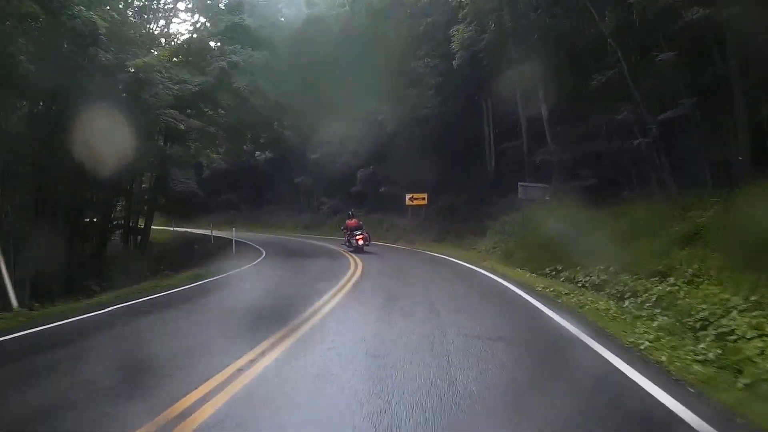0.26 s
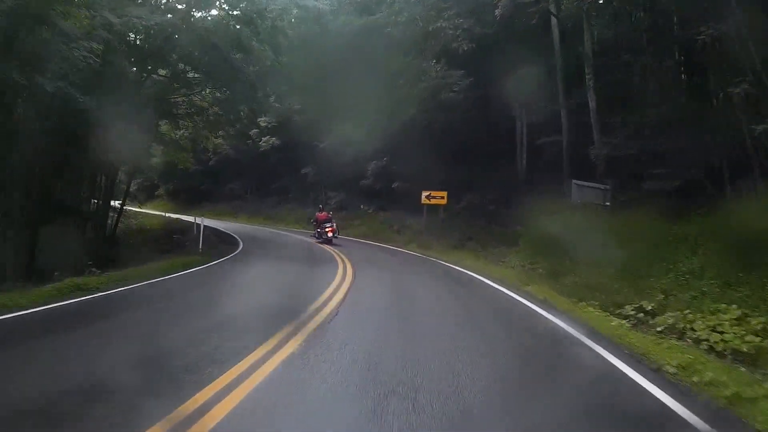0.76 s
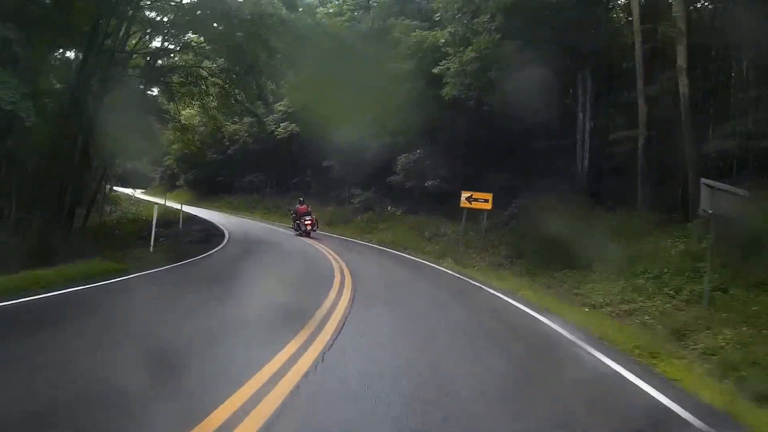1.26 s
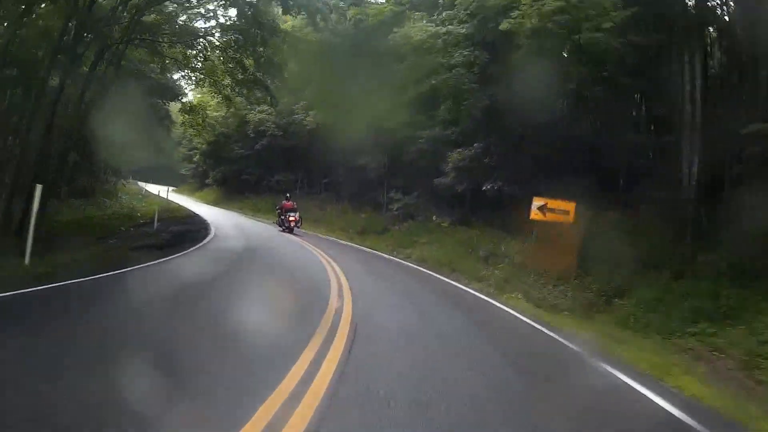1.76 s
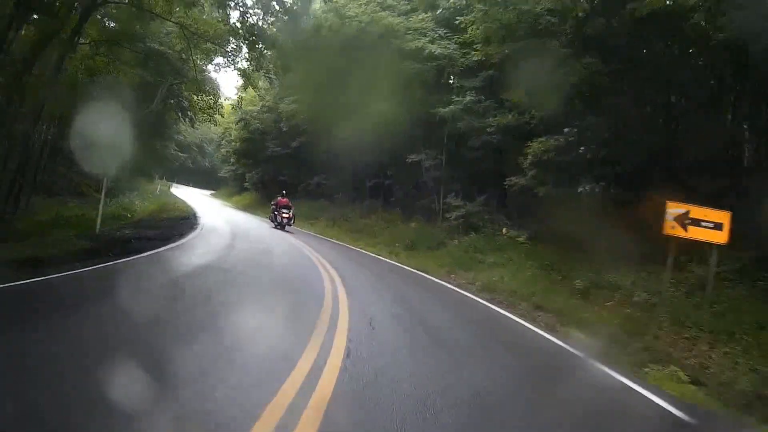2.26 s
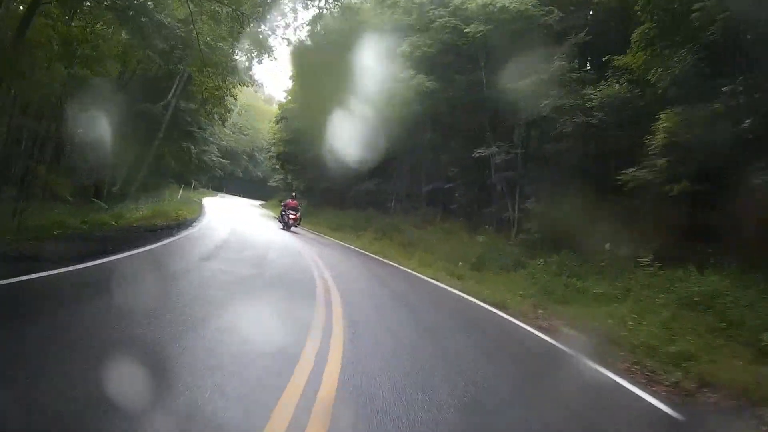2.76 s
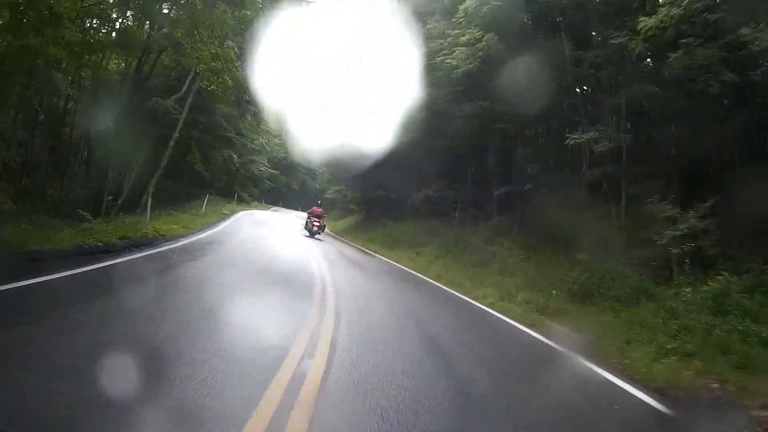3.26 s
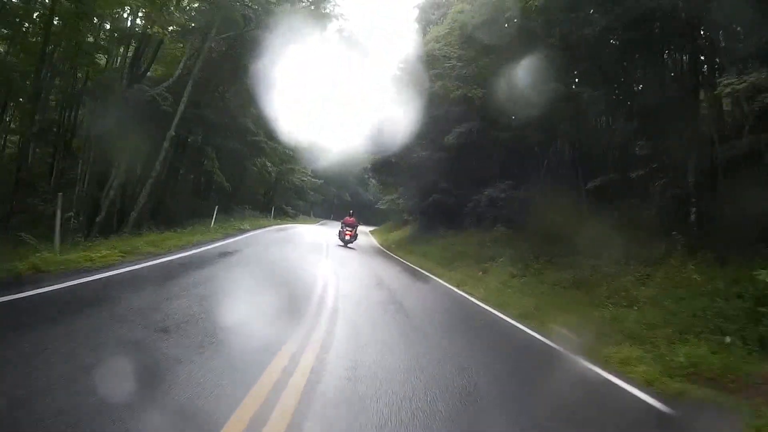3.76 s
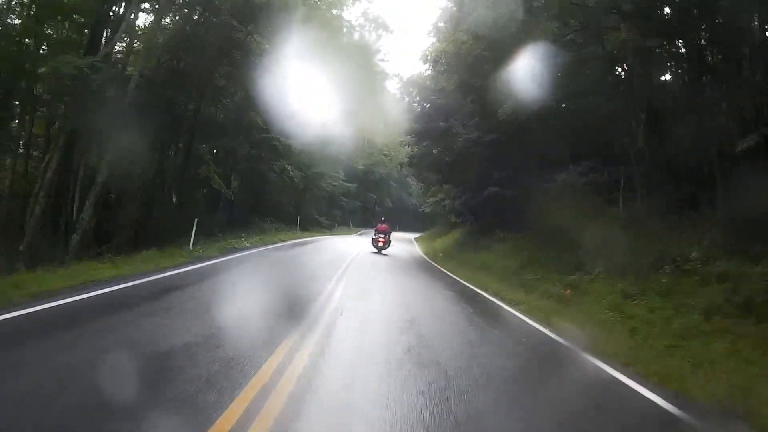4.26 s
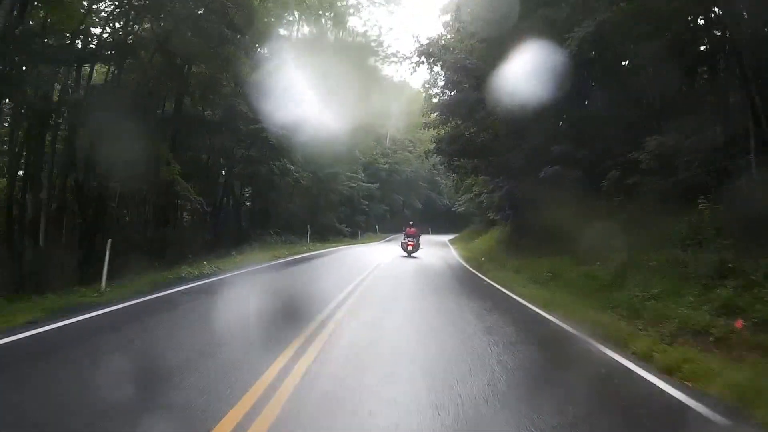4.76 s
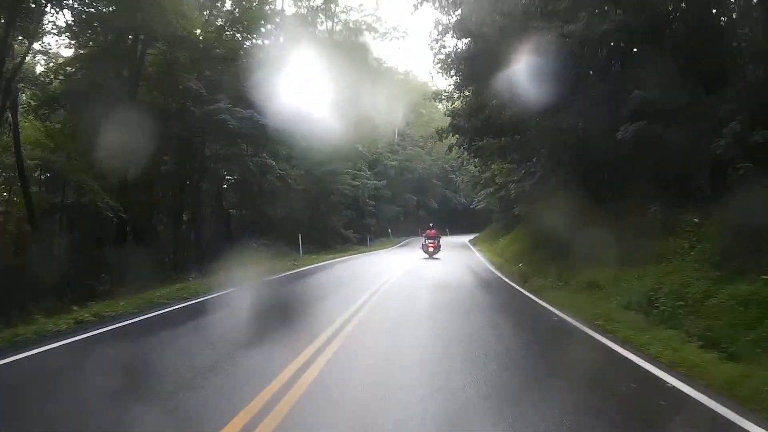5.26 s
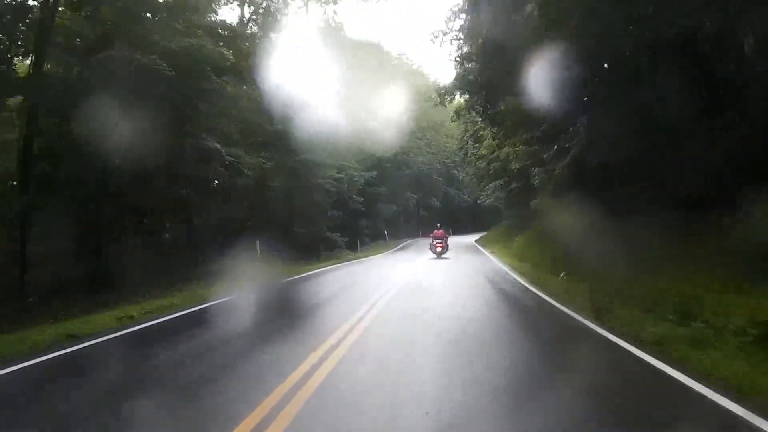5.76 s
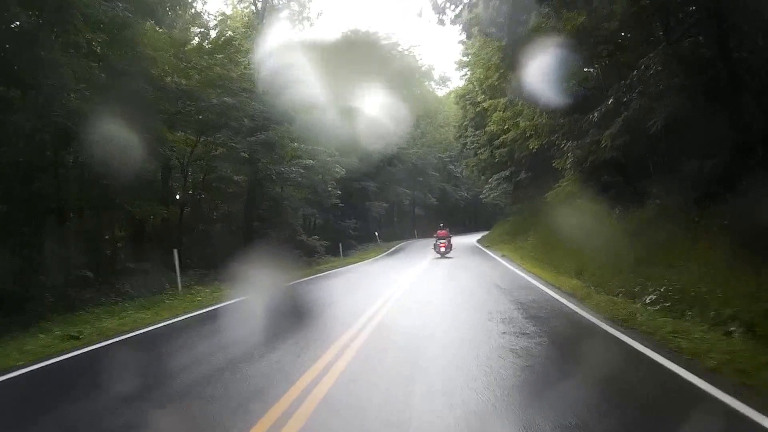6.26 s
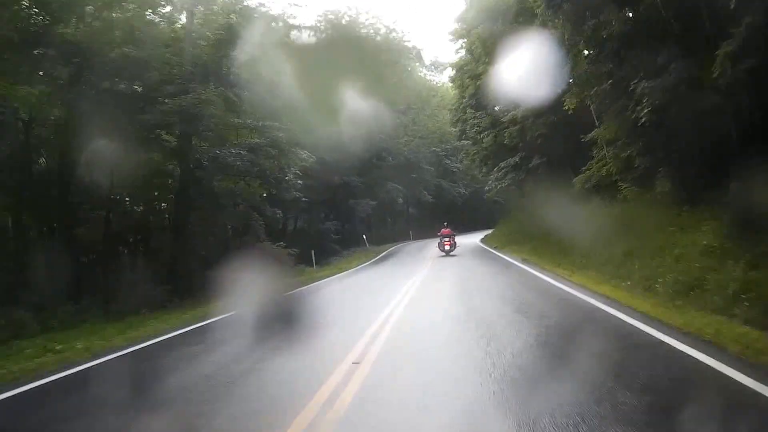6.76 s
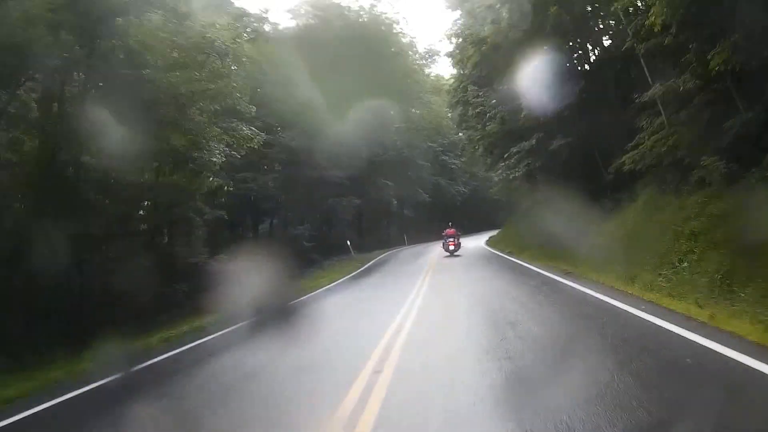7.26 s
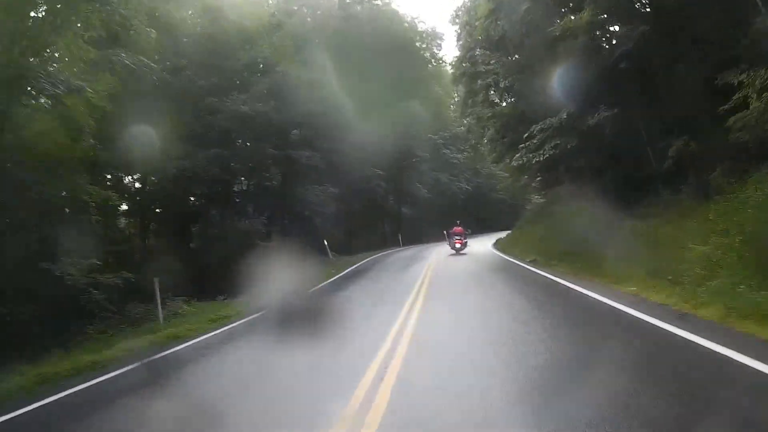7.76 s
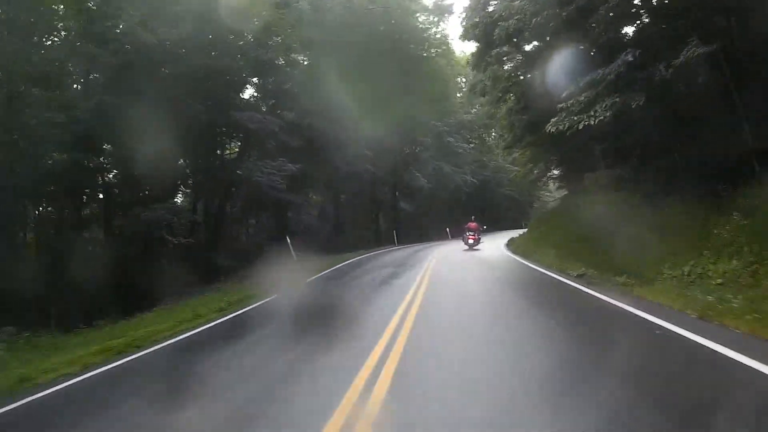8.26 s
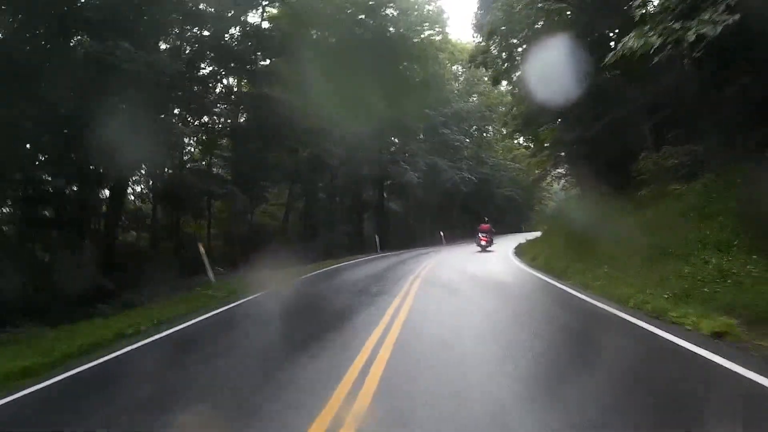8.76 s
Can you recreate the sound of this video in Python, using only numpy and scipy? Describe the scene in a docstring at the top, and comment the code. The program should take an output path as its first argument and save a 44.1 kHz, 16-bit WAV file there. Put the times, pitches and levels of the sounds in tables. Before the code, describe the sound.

A continuous on-board motorcycle ride on a wet road, heard close from the rider's seat. At 0 seconds the twin-cylinder engine falls in pitch, settling by about 0.7, with a brief lull in the exhaust before heavier thuds begin near 0.4. It lugs with a rough, uneven low throb; especially hard thumps cluster between 1.5 and 3 seconds, flattening at the microphone and momentarily choking the hiss. Faint thin treble ticks sizzle in flurries from 1.3 to 4.4. From about 2 seconds the pitch climbs slowly and the drone swells, its humming overtones shifting. Metallic valve rattle flutters through the wind. After 5.5 the rush of air, grainy tyre spray and fine top hiss grow clearly stronger. Low booming puffs build from 6 to 8.5, then ease abruptly near 8.6, while the engine keeps rising to the end at 9.

```python
"""A V-twin motorcycle heard from the rider's seat on a wet road: it slows at first, then slowly gathers speed.
Exhaust puffs are dip-and-crest pulses at uneven firing times; crank harmonics drone through fixed resonances.
The valve gear is noise gated by the firings, which also rings the casing.
Wind, spray and mist are coloured noises growing with speed; faint ticks sizzle at the very top.
The microphone flattens the hardest firings."""
import sys
import numpy as np
from scipy import signal
from scipy.fft import rfft, irfft
from scipy.io import wavfile
from scipy.ndimage import uniform_filter1d

SR = 44100
rng = np.random.default_rng(int(sys.argv[2]) if len(sys.argv) > 2 else 0)


def dump(signal):
    """Clip the signal to [-1, 1] and save it as 16-bit WAV at the path in sys.argv[1]."""
    limited = np.clip(np.atleast_2d(signal).T, -1, 1)
    pcm = np.round(limited * 32767).astype(np.int16)
    wavfile.write(sys.argv[1], SR, pcm)


N = 396900

# engine speed: t/s, crank rate/Hz
CRANK_SPEED = [(0, 44.65), (.65, 40.2), (1.3, 40.1), (1.95, 40.95), (2.63, 42.03), (3.88, 43.35),
               (5.14, 45.3), (5.76, 45.9), (6.12, 46.5), (7.4, 49.0), (8.2, 49.65), (9, 50.8)]
# throttle: t/s, mean peak of a usual puff/dB
PUFF_LEVEL = [(0, -18.5), (.28, -21), (.45, -12.5), (2, -16), (3.6, -12.5), (5.5, -13.5), (6.8, -7.5),
              (8.53, -4.5), (8.7, -13.5)]
CRUISE_HZ = 45  # crank rate at cruising speed


def undb(db):
    """Decibels to gain."""
    return 10 ** (np.asarray(db) / 20)


def unit(x):
    """Scale to rms 1."""
    return x / np.sqrt(np.mean(x ** 2))


def curve(table):
    """Second column of a table, joined by straight lines in time."""
    t_s, value = np.transpose(table)
    return np.interp(np.arange(N) / SR, t_s, value)


def octaves():
    """Engine speed in octaves above cruising speed."""
    return np.log2(curve(CRANK_SPEED) / CRUISE_HZ)


def colour(x, points):
    """Shape a sound by a spectrum of (f/Hz, level/dB) points, joined over log frequency; rms 1."""
    hz, db = np.transpose(points)
    f_hz = np.maximum(np.fft.rfftfreq(N, 1 / SR), 1)
    gain = undb(np.interp(np.log(f_hz), np.log(hz), db))
    return unit(irfft(rfft(x) * gain, N))


def noise(points):
    """Steady coloured noise, rms 1."""
    return colour(rng.standard_normal(N), points)


def ring(x, modes):
    """Drive a set of resonances; neighbours swing in opposite senses."""
    out = np.zeros(N)
    for k, (hz, width_hz, db) in enumerate(modes):
        b, a = signal.iirpeak(hz, hz / width_hz, fs=SR)
        out += (-1) ** k * undb(db) * signal.lfilter(b, a, x)
    return unit(out)


def walk(rate_hz):
    """Smooth random wandering, rms 1: random steps averaged twice."""
    hold = int(SR / rate_hz)
    steps = np.repeat(rng.standard_normal(N // hold + 1), hold)
    return unit(uniform_filter1d(uniform_filter1d(steps, hold), hold)[:N])


def clicks(times_s, sizes):
    """One impulse at each time."""
    return np.bincount(np.clip(times_s * SR, 0, N).astype(int), sizes, N + 1)[:N]


def decay(taps, decay_s):
    """Exponential tail after each tap."""
    return signal.lfilter([1], [1, -np.exp(-1 / (decay_s * SR))], taps)


def firings(lag_turns):
    """One firing halfway through each crank turn, every second one late: the angle between the cylinders."""
    turns = np.cumsum(curve(CRANK_SPEED)) / SR
    k = np.arange(int(turns[-1]))
    return np.interp(k + .5 + lag_turns * (k % 2), turns, np.arange(N) / SR)


def puffs(times_s, peaks_db, width_s, widen):
    """Each puff is a dip, then a crest of pressure; stronger ones last longer (width_s holds at 0 dB)."""
    out = np.zeros(N)
    for t_s, db in zip(times_s, peaks_db):
        i = np.arange(max(int(t_s * SR) - SR // 20, 0), min(int(t_s * SR) + SR // 20, N))
        u = (i / SR - t_s) / (width_s * undb(widen * db))
        out[i] += undb(db) * u * np.exp((1 - u ** 2) / 2)
    return out


def exhaust():
    """Thudding pressure puffs, less uneven as speed rises; a hard firing displaces any usual one near it."""
    # hardest firings: t/s, peak/dB
    hard = [(.333, -2.5), (.795, -6), (1.025, -5), (1.074, -4.5), (1.193, -6), (1.497, 0.5), (1.544, -1.5),
            (1.692, -2.5), (1.891, 3), (1.964, -5), (2.034, -0.5), (2.11, -2.5), (2.161, 1.5), (2.303, 3),
            (2.376, -3.5), (2.518, -1.5), (2.614, 3), (2.708, -2.5), (2.735, -2), (2.805, 0.5),
            (2.825, -.5), (2.922, 0.5), (2.995, 0.5), (3.507, -1.5), (3.903, -4), (4.245, -0.5),
            (4.784, -5), (5.839, -4.5), (6.016, -3.5), (6.1, -2), (6.337, -1.5), (6.529, -2), (6.55, 2),
            (7.139, 4), (7.953, 1.5), (8.555, 1), (8.795, 0)]
    times_s = firings(lag_turns=0.065)
    at = np.minimum((times_s * SR).astype(int), N - 1)
    scatter_db = 3.5 - 1 * octaves()[at]
    peaks_db = curve(PUFF_LEVEL)[at] + scatter_db * rng.standard_normal(len(times_s))
    hard_s, hard_db = np.transpose(hard)
    usual = np.abs(times_s[:, None] - hard_s).min(axis=1) > .012
    usual_puffs = puffs(times_s[usual], peaks_db[usual], width_s=0.0027, widen=0.069)
    return usual_puffs + puffs(hard_s, hard_db, width_s=0.0031, widen=0.27)


def drone(waver_db, wobble_turns, boom_db):
    """Crank harmonics climb with speed; pipe and casing resonances lift those passing through."""
    # drone swelling as the engine takes up the load: t/s, level of a 0 dB harmonic/dB
    swell = [(0, -41), (.8, -35), (2.5, -30), (4, -29), (5.5, -31.5), (6.6, -29), (7.8, -31.5), (9, -28.5)]
    # harmonics: multiple of crank rate, level when lugging/dB, level above cruising speed/dB
    harmonics = [(3.006, 5, 1), (3.53, -13, -2.5), (4.013, -7, 1), (5.003, -6, -4), (6, -2.5, -1),
                 (6.47, -13.5, -5), (7, -14, -1.5), (8, 0, -1.5), (9.01, 0, 2.5), (10.02, -19, -8.5),
                 (10.96, -7, -19), (11.99, 0, -25), (13.03, 0, -4), (14.02, -2, -12), (15, -3.5, -20),
                 (16, -7, -25), (23.87, -19.5, -21), (25, -20.5, -15), (26, -18, -17), (27.24, -17, -13)]
    # pipe and casing resonances: f/Hz, width/Hz, lift/dB
    lifts = [(268.4, 26, 5.5), (338.2, 32.4, 8.5), (1067, 54, 10.5)]
    change_octaves = 0.0083  # centre and scale of the change from lugging to fast levels
    crank_hz, level_db = curve(CRANK_SPEED), curve(swell)
    fast = (1 + np.tanh((octaves() - change_octaves) / change_octaves)) / 2
    turns = np.cumsum(crank_hz) / SR + wobble_turns * walk(25)
    # second harmonic booms as the throttle opens
    out = undb(curve(PUFF_LEVEL) + boom_db + 1.8 * walk(14)) * np.sin(4 * np.pi * turns)
    for k, lugging_db, fast_db in harmonics:
        lift_db = np.zeros(N)
        for hz, width_hz, db in lifts:
            lift_db += db / (1 + (2 * (k * crank_hz - hz) / width_hz) ** 4)
        pattern_db = lugging_db + fast * (fast_db - lugging_db)
        gain = undb(level_db + pattern_db + lift_db + waver_db * walk(12))
        out += np.sqrt(2) * gain * np.sin(2 * np.pi * k * turns)
    return out


def clatter(decay_s, scatter_db, attack_s):
    """Valve gear envelope, rms 1: a short, uneven rattle with each firing."""
    times_s = firings(lag_turns=.125)
    taps = clicks(times_s, undb(scatter_db * rng.standard_normal(len(times_s))))
    return unit(uniform_filter1d(decay(taps, decay_s), int(attack_s * SR) + 1))


def casing(db):
    """Valve gear keeps the engine casing ringing: clatter-gated noise drives its resonances."""
    # casing resonances: f/Hz, width/Hz, relative level/dB
    modes = [(1036, 11, 7), (1273, 16, 0), (1580, 92, -6.5)]
    rattle = rng.standard_normal(N) * clatter(decay_s=0.0054, scatter_db=1.5, attack_s=.001)
    return ring(rattle, modes) * undb(db)


def buffet():
    """Air buffets the fairing: low noise, growing with speed."""
    # spectrum: f/Hz, level/dB
    spectrum = [(20, -8), (40, 4.5), (110, 2.5), (170, 0.5), (250, -2.5), (450, -8), (680, -8.5),
                (850, -19.5), (1500, -60)]
    return noise(spectrum) * undb(-16 + 10.5 * octaves() + 0.67 * walk(14))


def wind():
    """Mid-band rush of air, growing with speed."""
    # spectrum: f/Hz, level/dB
    spectrum = [(300, -36), (600, -7), (800, -2), (1150, -2.5), (1350, -0.5), (1650, -2), (2000, -6),
                (2500, -11), (3500, -18.5), (6000, -83)]
    return noise(spectrum) * undb(-23.5 + 13.5 * octaves())


def spray(grain_db):
    """Tyre spray: noise made grainy by exponentially spread droplet strengths, then coloured."""
    # spectrum: f/Hz, level/dB
    spectrum = [(1500, -4.5), (2400, -7), (3100, 0.5), (3650, 4), (4100, -2.5), (4800, -6.5), (5450, -8),
                (6300, -20.5), (7500, -19), (9000, -25.5), (9800, -20), (10700, -30.5), (12200, -38),
                (13500, -48)]
    # spray: t/s, level/dB
    level = [(0, -32.5), (.7, -33), (1.5, -33.8), (2.1, -31), (3, -32.5), (5.5, -28), (9, -25)]
    droplets = rng.standard_normal(N) * undb(grain_db * np.minimum(rng.exponential(size=N), 6))
    return colour(droplets, spectrum) * undb(curve(level))


def mist():
    """Fine mist hissing at the top, thickening quickly with speed."""
    # spectrum: f/Hz, level/dB
    spectrum = [(6000, -10), (9000, -1), (12000, -1), (15500, -4), (17000, -20)]
    return noise(spectrum) * undb(-66 + 62 * octaves() + 2.5 * walk(150))


def rush(clatter_db, flutter_db, grain_db, gust_db):
    """Air and spray; the valve rattle pulses wind, spray and mist, so shares their colour."""
    rattle = undb(clatter_db) * clatter(decay_s=0.0031, scatter_db=2, attack_s=.001)
    flutter = undb(flutter_db * walk(45) + gust_db * walk(5.5))
    pulse = unit(np.sqrt(1 + rattle ** 2) * flutter)
    return buffet() + pulse * (wind() + spray(grain_db) + mist())


def sizzle(scatter_db, decay_s):
    """Flurries of faint, thin ticks far up in the treble: decaying bursts of hiss."""
    # flurries: start/s, end/s, mean tick level/dB
    flurries = [(1.283, 1.5, -52), (1.747, 1.95, -45), (2.22, 2.42, -48), (2.6, 4.4, -56)]
    ticks_per_s = 45
    taps = np.zeros(N)
    for start_s, end_s, db in flurries:
        slots_s = np.arange(start_s, end_s, 1 / ticks_per_s)
        late, size = rng.uniform(-1, 1, (len(slots_s), 2)).T
        taps += clicks(slots_s + late / ticks_per_s / 2, undb(db + scatter_db * size))
    hiss = noise([(10000, -39), (12500, -8), (15000, 0), (16000, -1), (18000, -23)])
    return hiss * decay(taps, decay_s)


def scene():
    """Engine, wind and wet road at one microphone."""
    engine = exhaust() + drone(waver_db=1, wobble_turns=0.0013, boom_db=-15.5) + casing(db=-38.0)
    air = rush(clatter_db=-7, flutter_db=0.77, grain_db=3.0, gust_db=0.4)
    return (engine + air + sizzle(scatter_db=5, decay_s=.004))[None]


def record(dry):
    """The microphone flattens the big puffs, choking the hiss for a moment; a steep low-pass cuts the top."""
    ceiling, knee, top_hz = .63, 12, 15900
    clipped = dry / (1 + np.abs(dry / ceiling) ** knee) ** (1 / knee)
    return signal.sosfilt(signal.ellip(10, .2, 90, top_hz, fs=SR, output="sos"), clipped)


dry = scene()
out = record(dry)
dump(out)
```